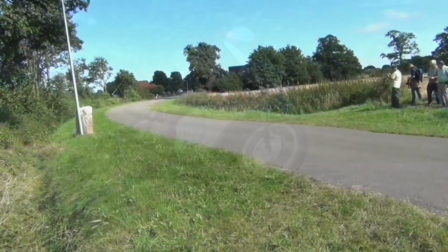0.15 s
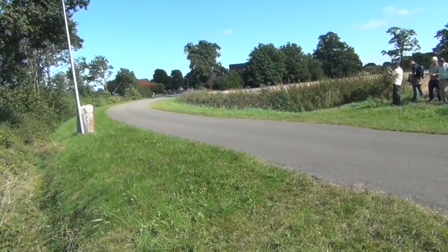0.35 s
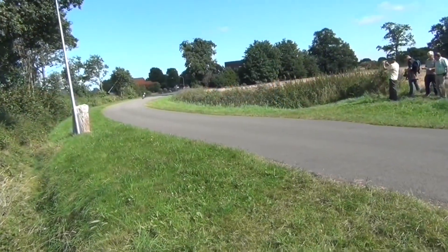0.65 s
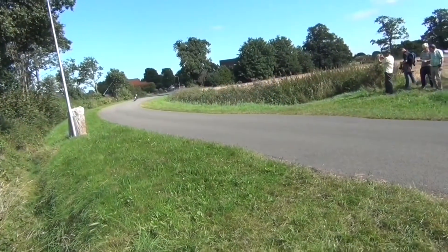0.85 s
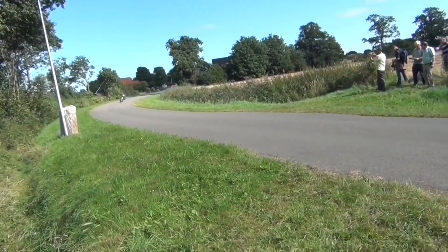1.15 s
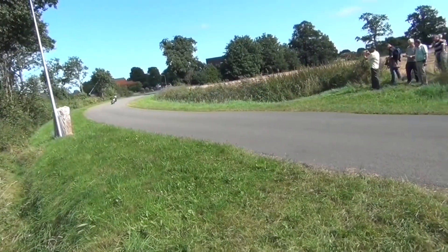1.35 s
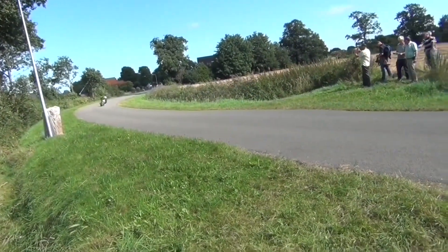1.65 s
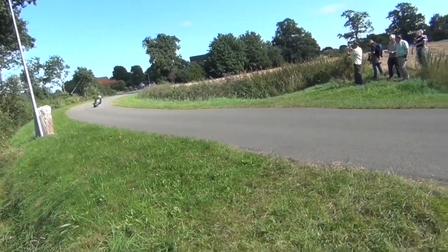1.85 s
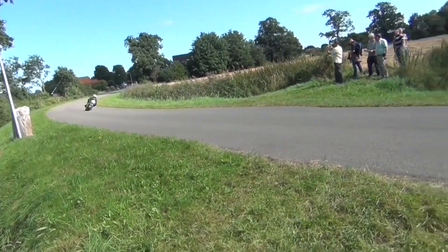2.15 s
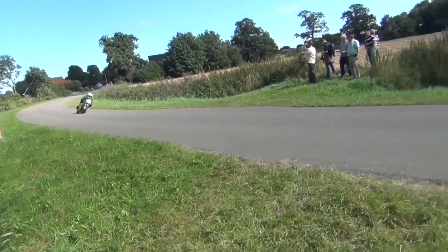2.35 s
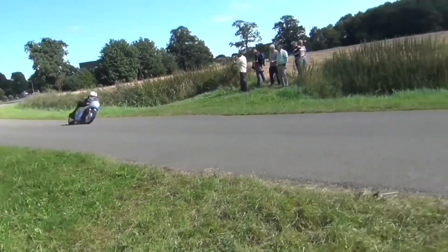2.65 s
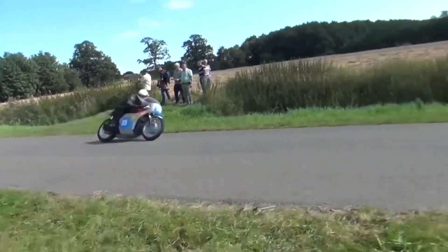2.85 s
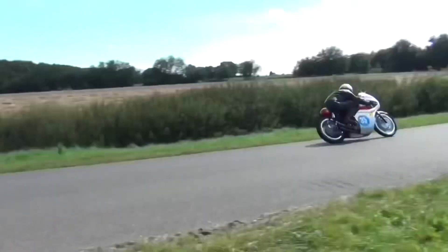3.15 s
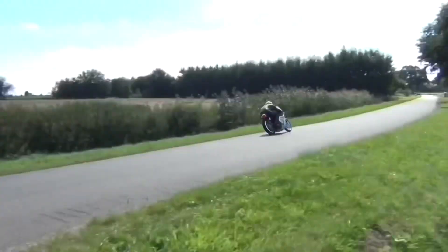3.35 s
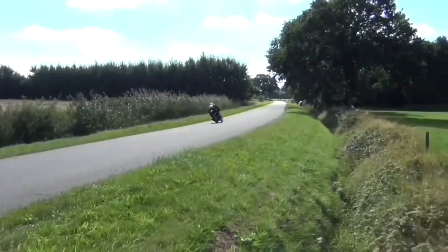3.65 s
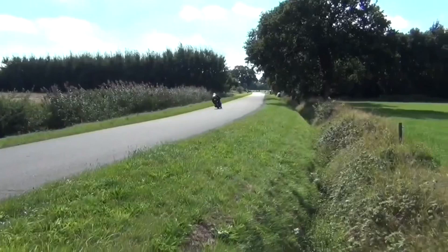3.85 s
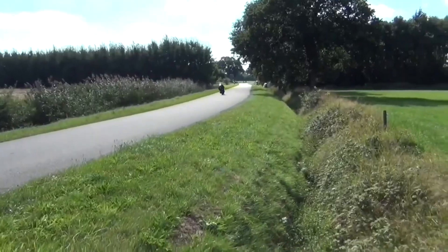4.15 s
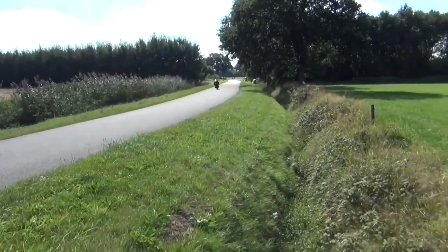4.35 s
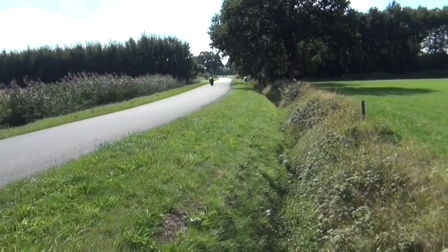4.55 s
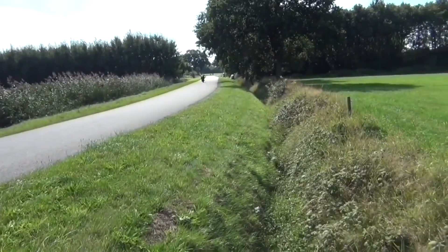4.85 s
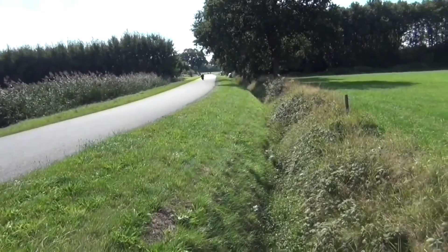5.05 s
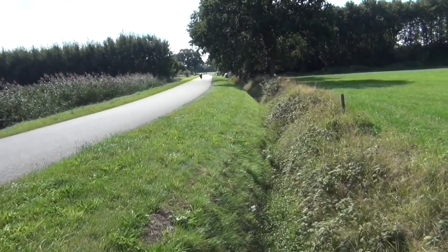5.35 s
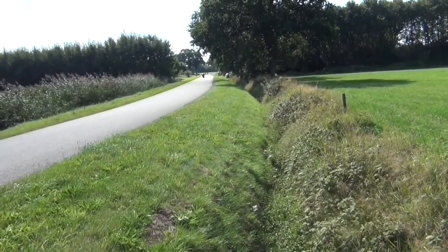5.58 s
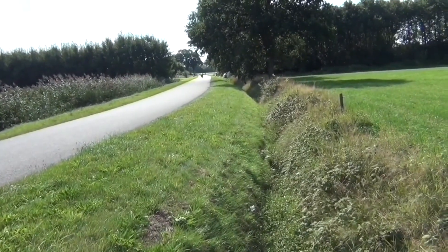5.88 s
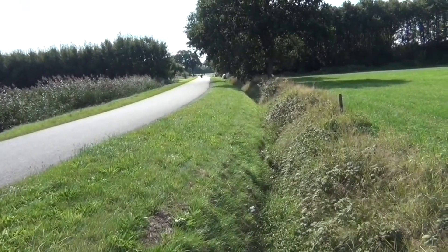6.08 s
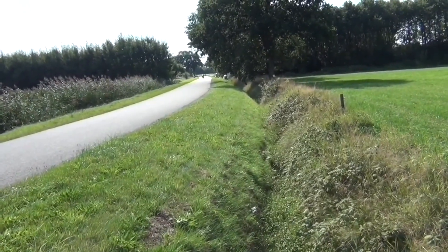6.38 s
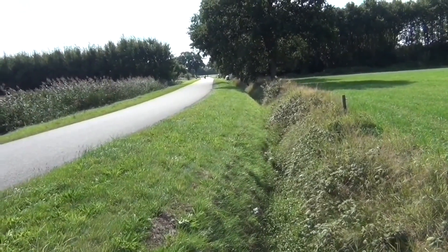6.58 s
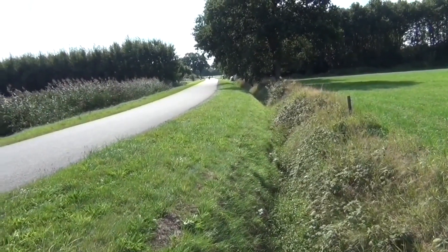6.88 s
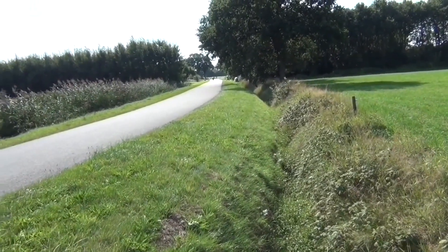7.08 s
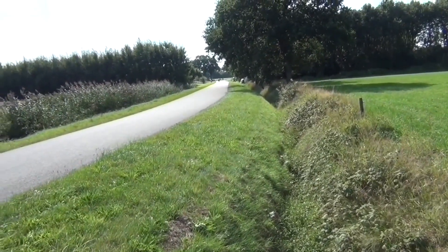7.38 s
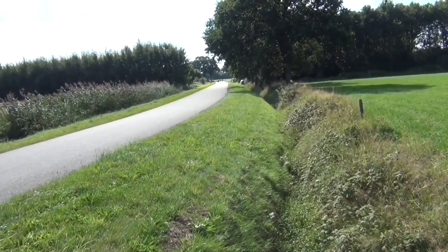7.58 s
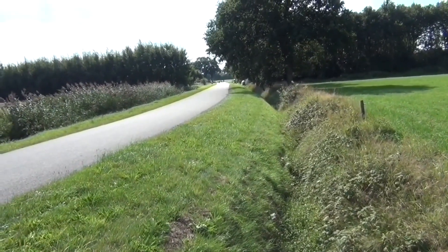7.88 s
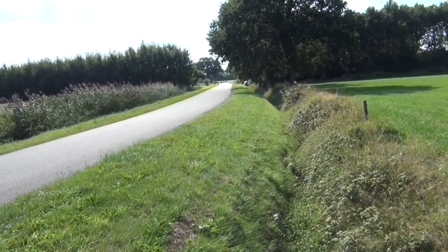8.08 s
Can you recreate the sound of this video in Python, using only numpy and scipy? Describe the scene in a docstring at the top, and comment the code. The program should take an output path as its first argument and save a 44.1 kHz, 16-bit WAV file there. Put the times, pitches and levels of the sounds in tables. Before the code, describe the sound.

A racing motorcycle approaches at high revs, screams past and pulls away, its pitch dropping, then pops through a gear change.

```python
"""A roadside in open grass, heard through a small stereo microphone. A four-cylinder racing motorcycle
on open pipes rounds a bend, screams past and pulls away until the throttle shuts for a gear change and
the pipes pop. Its firings make clean notes, an uneven burble and bark, and bursts of gas noise, all
bent in pitch by the pass and echoed by hedges. Two slow single-cylinder engines thump and rattle at
first and fade out; wind rumbles underneath."""
import sys
import numpy as np
from scipy import signal
from scipy.fft import rfft, irfft, next_fast_len
from scipy.io import wavfile
from scipy.ndimage import uniform_filter1d

SR = 44100
rng = np.random.default_rng(int(sys.argv[2]) if len(sys.argv) > 2 else 0)


def output_pcm(signal):
    """Save a mono or channel-first signal as 16-bit PCM at the path in sys.argv[1].

    Samples are clipped to [-1, 1] before scaling.
    """
    pcm = np.clip(np.atleast_2d(signal).T, -1, 1) * 32767
    wavfile.write(sys.argv[1], SR, np.round(pcm).astype(np.int16))


N = 362502

# colour of the wind's rumble and of its deep rumble: (frequency [Hz], level [dB])
RUMBLE_EQ = [(70, -31), (100, -9), (125, -6), (170, -5), (230, -2.5), (320, -32)]
DEEP_RUMBLE_EQ = [(15, -20), (25, -3.5), (40, -10.5), (65, -1), (90, -7), (110, -29)]
# fader ride of the wind: (time [s], rumble [dB], deep rumble [dB])
WIND_RIDE = [(0, -52, -59), (.85, -38.5, -57), (1.1, -42, -58), (1.45, -35.5, -53), (1.85, -44.5, -50),
             (2.5, -47.5, -53), (3.4, -55, -57), (4, -55, -63), (5.1, -60, -65), (6, -59, -62),
             (7.2, -53.5, -60), (7.8, -46.5, -68), (8.22, -41, -64)]

# fade-out of the two singles: (time [s], thump [dB], rattle [dB])
SINGLES_RIDE = [(0, -27, -38.5), (.15, -22.5, -37.5), (.35, -22, -35.5), (.43, -23, -36), (.49, -22.5, -34),
                (.55, -22.5, -35.5), (.62, -25, -38), (.7, -26, -37), (.78, -24, -35.5),
                (.87, -24.5, -34.5), (.92, -23.5, -39), (1, -23, -40), (1.2, -26.5, -45), (2.3, -37, -63),
                (2.8, -68, -96)]
# resonances of their pipe thump and their rattle: (frequency [Hz], width [Hz], level [dB])
THUMP_RESONANCES = [(266, 139, 0), (444, 236, 1), (640, 277, -6)]
RATTLE_RESONANCES = [(3600, 600, -4), (4350, 450, -2), (5400, 740, -18.5)]
# a metal ring under the rattle: (time [s], level against the rattle [dB])
RING_RIDE = [(0, -4), (.5, -15), (.6, -8), (.66, 5), (.74, 4), (.79, 3), (.83, -6), (.9, -8), (1, 3),
             (1.1, -10), (1.5, -10)]

# slapback off the hedges: (left delay [s], right delay [s], level [dB])
HEDGE_TAPS = [(0.018, 0.021, -39), (0.032, 0.032, -28), (.058, .071, -31.5)]
# the motorcycle's place in the image: (time [s], left over right [dB])
BIKE_PAN = [(0, 8), (1.3, 3), (2.06, 3), (2.72, 3.5), (2.95, 3), (3.15, -0.5), (3.35, -0.2), (3.66, 0.5),
            (5, 1.34), (6.5, 1.05), (8.22, 1.2)]
# the revs at the engine, with the gear change near the end: (time [s], firing rate [Hz])
FIRING_RATE = [(0, 268.2), (.4, 267.3), (.55, 259.4), (.85, 259.4), (1.02, 262.5), (1.5, 264.1),
               (2.54, 271.5), (2.8, 272.9), (3.1, 273.2), (3.5, 276.1), (4.12, 276.3), (4.3, 275),
               (4.6, 275.3), (6, 282), (6.8, 285.2), (7.6, 287), (7.63, 262), (7.65, 256), (7.665, 266),
               (7.69, 258), (7.72, 275.8), (7.9, 276), (8.22, 271.5)]
# the exhaust layers at full throttle:
# (time [s], firing note [dB], 2nd harmonic [dB], 3rd [dB], 4th [dB], burble [dB], bark [dB], rasp [dB])
EXHAUST_RIDE = [(0, -25, -45, -46, -49, -44, -40.5, -43), (.15, -44, -30, -34, -52, -43, -34.5, -42),
                (.35, -27, -29, -37, -52, -39, -32, -39.5), (.7, -38, -48, -45, -42, -37, -34, -44.5),
                (1, -32, -25.5, -39, -51, -32, -28, -38), (1.2, -22, -21.5, -26, -45, -24.5, -24, -30.5),
                (1.4, -23.5, -15.5, -21.5, -42, -22.5, -22, -29),
                (1.75, -21, -14, -17.5, -45, -24, -19.5, -34),
                (2.15, -15, -16.5, -15, -37, -24, -16, -31.5),
                (2.5, -19.5, -24, -21, -21, -22.5, -15, -27.5),
                (2.8, -21.5, -26, -22.5, -35, -23, -14, -26), (3, -20, -26, -20.5, -23, -15.5, -9, -23),
                (3.1, -28, -43, -16, -26, -18, -11.5, -25), (3.22, -27, -40, -17.5, -48, -14.5, -10, -23.5),
                (3.3, -25, -24, -23.5, -38, -17, -8.5, -21.5), (3.4, -31.5, -24, -35, -52, -17.5, -12, -21),
                (3.75, -27, -24.5, -32, -46, -23.5, -19, -21),
                (3.97, -26, -24.5, -26.5, -45, -23.5, -20, -21.5),
                (4.09, -25, -21.5, -22.5, -43, -21.5, -18.5, -24.5),
                (4.25, -26.5, -20, -26.5, -41, -27, -19, -25),
                (4.42, -26, -17.5, -22.5, -34, -24.5, -17.5, -27),
                (4.62, -25, -13, -19.5, -25, -22, -17, -27.5), (5, -29, -17.5, -20, -31.5, -23, -15, -26),
                (5.5, -26.5, -22, -16, -22.5, -24, -17, -26.5),
                (6, -26, -22, -17, -23.5, -24, -17.5, -28.5),
                (6.5, -26.5, -22.5, -15.5, -19.5, -26.5, -17.5, -26.5),
                (7, -25.5, -23.5, -16.5, -17.5, -27, -16.5, -30),
                (7.3, -26, -23, -18.5, -19, -26.5, -14.5, -28),
                (8.22, -23.5, -22.5, -20, -18.5, -26, -17.5, -34.5)]
# the exhaust swells or dips briefly: (time [s], width [s], gain [dB])
EXHAUST_SWAYS = [(1.602, 0.045, 2.5), (2.62, .04, -2), (3.98, 0.018, -1), (4.08, 0.019, 2),
                 (4.82, 0.018, -2), (5.75, 0.088, -1), (7.2, 0.033, -1.5)]
# the cough of the gear change:
# (time [s], two low notes [dB], two high notes [dB], burble [dB], bark and rasp [dB])
SHIFT_DUCK = [(7.612, -2, 1, -1, -2), (7.63, -12, -17, -5, -14), (7.642, -8, -18, -2, -11),
              (7.655, -10, -22, 0, -5), (7.69, -8, -21, 1, -5), (7.705, -3, -1, -0.5, -1)]
# part throttle after it, one entry for each exhaust layer: (gain [dB])
PART_THROTTLE_TRIM = [-5.5, -17, -1, -10, -3.5, -7, -15.5]
# tone of the pipes from five views: (order [multiple of the cycle rate, rounded when played],
# far in front [dB], near [dB], abreast [dB], just past [dB], far behind [dB])
ORDERS_BY_VIEW = [(2, -40, -45, -41, -43.5, -36), (3, -14.5, -23, -23.5, -40, -32.5),
                  (5, -16.5, -11, -5, -25, -29), (6, -32, -12, -19, -36, -26.5), (7, -12, -11, 1, -12, -14),
                  (9, -13.5, -9, -1, -17.5, -16.5), (10, -8, -35, -37, -19, -9.5),
                  (11, -14.5, -19, -8.5, -16.5, -11), (13, -6, -29, -11, -14.5, -12),
                  (14, -10, -14, -20, -18, -5), (15, -8.5, -23, -11, -10, -10),
                  (17, -5.5, -3.5, -19, -10, -8), (18, -22, -19, -16, -50, -52.5),
                  (19.2, -10, -10, -17, -4, -6), (20, -3, -22, -4, -24, -4.5),
                  (21, -16, -10.5, -6, -11.5, -9.5), (22, -12.5, -34, -35, -8, -7.5),
                  (23, -33, -20, -19, -10, -15), (23.51, -3, -11.5, -7.5, -9.5, -6),
                  (25, -9, -20, -31, -17, -14.5), (26, -28, -16, -20, -10, -21.5),
                  (27, -11, -18, -14.5, -16, -8.5), (28, -20, -12, -5.5, -7, -46),
                  (29, -7, -11, -15, -12, -13), (30, -46, -29, -17, -45, -17), (31, -20, -13, -5, -10, -18),
                  (32, -27, -34, -25, -17, -9.5), (33.38, -9, -12.5, -17, -10, -27.5)]
# which of those views faces the listener: (distance past the listener [m], view [0-4])
VIEW_ALONG_ROAD = [(-41, 0), (-22, 1), (-9, 1), (-2.7, 2), (5.3, 2), (12.5, 3), (47, 3), (69, 4)]
# the gas jet, one entry for each pipe: (level [dB])
JET_LEVELS = [-4, -5.5, 2, 0]
# colour of the gas noise: rasp, roar, hiss from behind and from in front: (frequency [Hz], level [dB])
RASP_EQ = [(2400, -11.5), (2800, -4), (3600, -3), (4500, -5.5), (5600, -10), (6500, -14), (8000, -27.5)]
ROAR_EQ = [(120, -32.5), (250, -11.5), (500, -5), (1000, -2.5), (1500, -1.5), (2100, -3.5), (2800, -7.5),
           (3600, -19.5)]
HISS_BEHIND_EQ = [(3290, -30), (5000, -3), (5800, -3), (7460, 0.5), (8300, -6), (8950, -12), (9700, -8),
                  (10200, -12), (10700, -16), (12300, -18), (15600, -30)]
HISS_AHEAD_EQ = [(3290, -31), (5000, -6), (6500, -1.5), (8500, -8), (11000, -15.5), (15600, -31)]
# brief boosts and cuts in the snarl: (time [s], width [s], frequency [Hz], width [Hz], gain [dB])
SNARL_MOVES = [(3.02, 0.035, 4500, 1500, -3), (3.2, .04, 3900, 900, 5), (3.31, .05, 4900, 1000, 5),
               (3.45, 0.072, 7200, 2000, 1), (3.5, .07, 3900, 1200, -3), (3.75, .1, 2640, 800, -0.5),
               (4.02, 0.054, 2230, 900, -6.5), (4.3, 0.054, 3730, 1200, 3), (4.45, 0.046, 3830, 1200, -3),
               (4.7, 0.04, 3200, 900, 2.5), (4.8, 0.054, 3660, 1000, -4), (5.27, 0.058, 3470, 1200, 3),
               (5.55, .06, 2600, 500, 4), (5.65, 0.09, 4350, 1500, -2), (5.7, 0.16, 1610, 500, 3),
               (5.9, 0.13, 2170, 500, -7.5), (6.0, .1, 3300, 1200, 2), (6.38, 0.087, 2320, 500, 5.5),
               (6.45, 0.077, 3600, 900, 1), (6.6, 0.06, 2070, 400, 8), (6.65, .06, 4700, 1000, 5),
               (6.76, .08, 3170, 500, 4.5), (6.88, 0.094, 4400, 1500, -2.5), (7.15, 0.098, 2160, 500, 5.5),
               (7.15, 0.063, 3300, 800, -3), (7.3, 0.038, 3400, 700, 7), (7.4, 0.092, 4600, 900, 2.5),
               (7.48, 0.06, 2900, 500, 5.5), (8, .2, 2800, 1200, -4)]
# fader ride of the overload crackle: (time [s], level [dB])
OVERLOAD_RIDE = [(0, -70), (4.9, -59), (5.3, -35), (5.6, -40), (5.85, -37), (6.3, -45), (6.55, -37),
                 (6.75, -55), (7.03, -55), (7.08, -32), (7.3, -29.5), (7.56, -32), (7.6, -70), (8.22, -70)]
# pops once the throttle has shut: (time [s], level [dB])
POP_CUES = [(7.651, -18), (7.6674, -22), (7.6824, -11), (8.1193, -10)]
# the pipe's ring under a pop: (frequency [Hz], width [Hz], level [dB])
POP_RESONANCES = [(1300, 740, 4), (2800, 680, 5.5), (4600, 1600, -18)]

SPEED_M_S, ROADSIDE_M, PASS_S, SOUND_M_S = 40.5, 8.75, 3.115, 343
SHUT_S = 7.7   # part throttle from here on
NOTE_LAG_RAD = .5   # each harmonic of the firing note lags the one below
CONTROL_STEP = 64   # samples between the values of a slow control curve


def from_db(db):
    """Decibels to gain."""
    return 10 ** (np.asarray(db) / 20)


def rms_one(x):
    """Normalise to rms 1."""
    return x / np.sqrt(np.mean(x ** 2) + 1e-20)


def automation(rows):
    """One curve for each column of a timed table, one value a sample."""
    times, *columns = np.transpose(rows)
    return [np.interp(np.arange(N) / SR, times, column) for column in columns]


def butter(order, hz, kind="low"):
    """Filter sections with a flat passband."""
    return signal.butter(order, hz, kind, fs=SR, output="sos")


def drift(rate_hz, count):
    """Slow random control curves of spread 1."""
    pole = np.exp(-2 * np.pi * rate_hz * CONTROL_STEP / SR)
    noise = rng.standard_normal((count, N // CONTROL_STEP + 1002))
    slow = signal.lfilter([1], [1, -2 * pole, pole * pole], noise)[:, 1000:]
    return slow / slow.std(axis=1, keepdims=True)


def linked_drift(rate_hz, count, shared):
    """A bank of drifts, each sharing part of its movement with its neighbours."""
    own = drift(rate_hz, count)
    common = 3 * uniform_filter1d(drift(rate_hz, count), size=9, axis=0)
    return np.sqrt(1 - shared) * own + np.sqrt(shared) * common


def glide(slow):
    """Ramp a control curve up to audio rate."""
    return np.interp(np.arange(N) / CONTROL_STEP, np.arange(len(slow)), slow)


def coloured(x, eq):
    """Shape a signal with an EQ curve; rms 1."""
    hz, db = np.transpose(eq)
    size = next_fast_len(N)
    grid = np.maximum(np.fft.rfftfreq(size, 1 / SR), 1)
    gain = from_db(np.interp(np.log(grid), np.log(hz), db, left=-120, right=-120))
    return rms_one(irfft(rfft(x, size) * gain)[:N])


def resonate(x, modes):
    """Parallel resonators of alternating polarity."""
    out = 0
    for k, (hz, width_hz, db) in enumerate(modes):
        r = np.exp(-np.pi * width_hz / SR)
        gain = (1 - r * r) / 2 * (-1) ** k * from_db(db)
        poles = [1, -2 * r * np.cos(2 * np.pi * hz / SR), r * r]
        out = out + signal.lfilter([gain, 0, -gain], poles, x)
    return out


def pan(x, pan_db, band_hz):
    """Pan one band only: close microphone ports tell left from right best in the mids."""
    middle = signal.sosfiltfilt(butter(2, band_hz, "band"), x)
    return x + np.tanh(np.log(from_db(pan_db)) / 2) * middle * [[1], [-1]]


def wind():
    """A bed of two low rumbles, each with its own gusts."""
    layers = zip((RUMBLE_EQ, DEEP_RUMBLE_EQ), automation(WIND_RIDE), drift(2.5, count=2))
    return sum(coloured(rng.standard_normal(N), eq) * from_db(db + 2.5 * glide(gust))
               for eq, db, gust in layers)


def firing_clicks(hz, first_s, scatter_db):
    """One click for each firing of a single cylinder, uneven in level."""
    turns = np.arange(1, N + 1) * hz / SR - hz * first_s
    fired = np.diff(np.floor(turns), prepend=np.floor(turns[0])) > 0
    return fired * from_db(scatter_db * rng.standard_normal(N)) + 1e-18


def singles():
    """Two slow engines: each firing thumps in the pipe, and the slower one also rattles brightly."""
    thump_db, rattle_db = automation(SINGLES_RIDE)
    slower = firing_clicks(hz=40.03, first_s=.0364, scatter_db=1.2)
    faster = firing_clicks(hz=45.2, first_s=.0195, scatter_db=-3)
    thump = rms_one(resonate(from_db(5) * slower + faster, THUMP_RESONANCES))
    breath = from_db(-5.5) * rms_one(resonate(rng.standard_normal(N), THUMP_RESONANCES))
    thump = from_db(thump_db) * signal.sosfilt(butter(2, 130, "high"), thump + breath)
    bursts = signal.lfilter([1], [1, -np.exp(-1 / (.0032 * SR))], slower)   # 3.2 ms decay
    blows = signal.sosfilt(butter(4, 7000), bursts * rng.standard_normal(N) + 5 * slower)
    ring = rms_one(resonate(blows + 12 * slower, [(1970, 120, 0)]))
    ring *= from_db(automation(RING_RIDE)[0])
    whirr = from_db(-6) * rms_one(resonate(rng.standard_normal(N), RATTLE_RESONANCES))
    rattle = rms_one(resonate(blows, RATTLE_RESONANCES)) + ring + whirr
    rattle = from_db(rattle_db) * signal.sosfilt(butter(4, 8000), rattle)   # distance takes the top
    return pan(thump, pan_db=-7.5, band_hz=(450, 1100)) + pan(rattle, pan_db=5.5, band_hz=(1200, 8000))


def hedge_echoes(bike):
    """Hedges throw back a few faint, band-limited slaps."""
    dull = signal.sosfilt(butter(2, (700, 11000), "band"), bike)
    echoes = np.zeros((2, N))
    for *delays_s, db in HEDGE_TAPS:
        for side, delay_s in enumerate(delays_s):
            lag = round(delay_s * SR)
            echoes[side, lag:] += from_db(db) * dull[:-lag]
    return echoes


def moving_air(x, far_m, depth_db=.9, reach_m=74):
    """Moving air makes treble bands swell and sink, more so over a longer path."""
    edges_hz = (1100, 1600, 2200, 2900, 3800, 5000, 7000, 11000)
    swell_db = depth_db * np.minimum(far_m / reach_m, 1)
    bands = [signal.sosfilt(butter(1, edges, "band"), x) for edges in zip(edges_hz, edges_hz[1:])]
    swells = drift(4.2, len(bands))
    return x + sum((from_db(swell_db * glide(swell)) - 1) * band for swell, band in zip(swells, bands))


def road_bounce(x, past_m, far_m, doppler, upright_pipe_m=.28, ear_m=1.3, reach_m=21):
    """The bounce off the road flanges the direct sound: notches sweep down and up again."""
    pipe_m = upright_pipe_m * np.clip(1 + .018 * past_m, .5, 1)   # leaning in the bend lowers the pipes
    delay_s = 2 * pipe_m * ear_m / far_m / SOUND_M_S / doppler
    strength = .62 / (1 + (far_m / reach_m) ** 4)
    dull = signal.sosfiltfilt(butter(1, 8500), x)   # the rough road scatters the top
    bounce = np.interp(np.arange(N) - delay_s * SR, np.arange(N), dull)
    return (x + strength * bounce) / np.sqrt(1 + strength ** 2)


def pass_by():
    """Metres past the listener, distance and pitch ratio of a straight pass, as the sound arrives."""
    sent_s = np.arange(-SR, N + SR) / SR
    far_m = np.hypot(ROADSIDE_M, SPEED_M_S * (sent_s - PASS_S))
    heard_s = sent_s + (far_m - ROADSIDE_M) / SOUND_M_S
    sent_s = np.interp(np.arange(N) / SR, heard_s, sent_s)
    past_m = SPEED_M_S * (sent_s - PASS_S)
    return past_m, np.hypot(ROADSIDE_M, past_m), np.gradient(sent_s) * SR


def overload_crackle(cycle, accents_db=(-4, -29, -9.5, -30), scatter_db=3):
    """Overload crackle: bright, clipping-like clicks in step with the pulses, two in every four accented."""
    pulse = (cycle * 4 / (2 * np.pi)).astype(int)
    db = np.array(accents_db)[pulse % 4] + scatter_db * rng.standard_normal(pulse[-1] + 1)[pulse]
    clicks = (np.diff(pulse, prepend=0) > 0) * from_db(db + automation(OVERLOAD_RIDE)[0]) + 1e-18
    return signal.sosfilt(butter(4, 9000, "high"), clicks)


def pops():
    """Unburnt gas goes off and rings a pipe."""
    clicks = np.full(N, 1e-18)
    for s, db in POP_CUES:
        clicks[round(s * SR)] = from_db(db + 13)
    return resonate(clicks, POP_RESONANCES)


def gas_jets(cycle, sharpness=1.7, scatter_db=2):
    """Three noise feeds that surge together as each firing shoots gas from its pipe."""
    noise = rng.standard_normal((3, N))
    firing = (cycle * 4 / (2 * np.pi) + .5).astype(int)
    db = np.array(JET_LEVELS)[firing % 4] + scatter_db * rng.standard_normal(firing[-1] + 1)[firing]
    surge = from_db(db) * np.exp(sharpness * (np.cos(4 * cycle) - 1))
    return noise * (.73 + surge)


def pipe_hiss(jet, rasp_db, past_m, far_m, shut):
    """Gas hisses from the pipe mouths, shaded while they point away and fainter with distance."""
    air_loss_db = np.minimum(.12 * far_m, 17.5)
    shade_db = 3 * np.maximum(-past_m / far_m, 0)
    db = rasp_db - 2.5 - air_loss_db - shade_db + 5.5 * shut   # drops less than the rasp on part throttle
    behind = np.clip(.58 + past_m / far_m, 0, 1)
    hiss = behind * coloured(jet, HISS_BEHIND_EQ) + (1 - behind) * coloured(jet, HISS_AHEAD_EQ)
    top = signal.sosfiltfilt(butter(2, 9500, "high"), hiss)
    top_gain = from_db(.48 * (db + 32.5))   # the very top fades faster than the rest of the hiss
    return from_db(db) * (hiss + (top_gain - 1) * top)


def snarl(x):
    """Brief bell boosts and cuts make the upper layers snarl."""
    t = np.arange(N) / SR
    out = x.copy()
    for s, width_s, hz, width_hz, db in SNARL_MOVES:
        gain = from_db(db * np.exp(-((t - s) / width_s) ** 2 / 2))
        out += (gain - 1) * resonate(x, [(hz, width_hz, 0)])
    return out


def partials(cycle, orders, db, waver_db, spread_rad, wander_rad, shared):
    """Orders of the engine cycle stack into pulses and waver in moving air; rms 1."""
    orders = np.round(orders)
    gains = from_db(db + waver_db * linked_drift(3.34, len(orders), shared)[:, :db.shape[1]])
    gains /= np.sqrt(uniform_filter1d((gains ** 2).sum(axis=0), size=60) / 2)
    scatter = spread_rad * rng.standard_normal(len(orders))
    # harmonics of the firing note keep step with the clean notes, the others crack against them
    in_step = np.pi - NOTE_LAG_RAD * (orders / 4 - 1) + .39 * scatter
    phases = np.where(orders % 4 == 0, in_step, scatter)
    phases = phases[:, None] + wander_rad * linked_drift(6.6, len(orders), shared)
    return sum(glide(gain) * np.cos(order * cycle + glide(phase))
               for order, gain, phase in zip(orders, gains, phases))


def pipe_orders(past_m, top_by_view_db=(-20.5, -17, -12.5, -12, -15.5)):
    """Orders up to 42 and their levels, crossfading between views as the pipes turn to the listener."""
    top = np.arange(ORDERS_BY_VIEW[-1][0] + 1, 43)
    top_db = -.47 * (top - top[0]) + 4 * (np.round(top) % 4 == 0)   # firing harmonics stand out
    top_rows = np.c_[top, np.add.outer(top_db, top_by_view_db)]
    rows = np.r_[ORDERS_BY_VIEW, top_rows]
    view = np.interp(past_m, *np.transpose(VIEW_ALONG_ROAD))
    return rows[:, 0], np.array([np.interp(view, np.arange(5), row) for row in rows[:, 1:]])


def uneven_pipes(cycle, past_m, shut):
    """Unequal pipes fill in around the firing notes: low burble, mid bark and a buzzing edge."""
    orders, db = pipe_orders(past_m[::CONTROL_STEP])
    tilt_db = -21.5 * np.maximum(orders - 17, 0) / 25   # the bark darkens on part throttle
    db += np.outer(tilt_db, shut[::CONTROL_STEP])
    low = orders < 16.5
    burble = partials(cycle, orders[low], db[low],
                      waver_db=2, spread_rad=1.32, wander_rad=.25, shared=.19)
    bark = partials(cycle, orders[~low], db[~low],
                    waver_db=2.5, spread_rad=.78, wander_rad=.45, shared=.33)
    high = np.arange(43, 80)
    edge_db = 7.9 * (high % 4 == 0) + 2.3 * (high % 2) - .43 * (high - high[0])
    edge_db = np.outer(edge_db, np.ones(db.shape[1]))
    edge = partials(cycle, high, edge_db, waver_db=3, spread_rad=.6, wander_rad=.21, shared=.4)
    return burble, bark, edge


def firing_notes(cycle, notes_db, shut):
    """The firing rate sings as four clean harmonics that flutter more on part throttle."""
    flutter, depth_db = drift(30, count=4), .53 + 1.5 * shut
    notes = 0
    for k, db in enumerate(notes_db):
        gain = np.sqrt(2) * from_db(db + depth_db * glide(flutter[k]))
        notes = notes + gain * np.cos(4 * (k + 1) * cycle - NOTE_LAG_RAD * k)
    return notes


def throttle_ride():
    """Levels of the exhaust layers: full throttle with brief sways, gear change, then part throttle."""
    t = np.arange(N) / SR
    sway_db = sum(db * np.exp(-((t - s) / width_s) ** 2 / 2) for s, width_s, db in EXHAUST_SWAYS)
    duck_db = np.array(automation(SHIFT_DUCK))[[0, 0, 1, 1, 2, 3, 3]]
    trim_db = np.outer(PART_THROTTLE_TRIM, np.clip((t - SHUT_S) / .0047, 0, 1))
    return np.array(automation(EXHAUST_RIDE)) + sway_db + duck_db + trim_db


def motorcycle():
    """Four open pipes race past: firing notes and burble below; bark, roar, rasp and hiss on top."""
    past_m, far_m, doppler = pass_by()
    cycle = 2 * np.pi * np.cumsum(doppler * automation(FIRING_RATE)[0] / 4) / SR   # four firings a cycle
    shut = np.arange(N) > SHUT_S * SR
    *notes_db, burble_db, bark_db, rasp_db = throttle_ride()
    notes = firing_notes(cycle, notes_db, shut)
    burble, bark, edge = uneven_pipes(cycle, past_m, shut)
    rasp_jet, roar_jet, hiss_jet = gas_jets(cycle)
    # grit trades tone for gas noise: far ahead, a little far behind, on part throttle and abreast
    grit_db = .1509 * np.maximum(-past_m, 0) + .0345 * np.maximum(past_m, 0)
    grit_db += 3 * shut + 3 * np.exp(-(past_m / 9) ** 2)
    rasp = from_db(1.5 - .7 * grit_db) * edge + from_db(-3.5) * coloured(rasp_jet, RASP_EQ)
    roar = from_db(grit_db - 12.3) * coloured(roar_jet, ROAR_EQ)
    bark = from_db(-.4 * grit_db) * bark + roar
    hiss = pipe_hiss(hiss_jet, rasp_db, past_m, far_m, shut)
    upper = from_db(bark_db) * bark + from_db(rasp_db) * rasp + hiss
    upper = snarl(moving_air(upper, far_m))
    upper = road_bounce(upper, past_m, far_m, doppler)
    # flipped polarity: the uneven layers crack downwards against the notes
    return notes - from_db(burble_db) * burble - upper + pops() + overload_crackle(cycle)


def scene():
    """The motorcycle up front, over the two singles, the hedge echoes and the wind."""
    bike = motorcycle()
    background = singles() + hedge_echoes(bike) + wind()
    return background + pan(bike, automation(BIKE_PAN)[0], band_hz=(700, 13000))


def record(dry, ceiling=.97):
    """The small microphone: peaks soft-clipped, deep bass rolled off, the very top cut."""
    rounded = dry / (1 + (dry / ceiling) ** 6) ** (1 / 6)
    thinned = signal.sosfilt(butter(1, 55, "high"), rounded)
    return signal.sosfilt(signal.cheby2(16, 70, 16150, fs=SR, output="sos"), thinned)


dry = scene()
out = record(dry)
output_pcm(out)
```